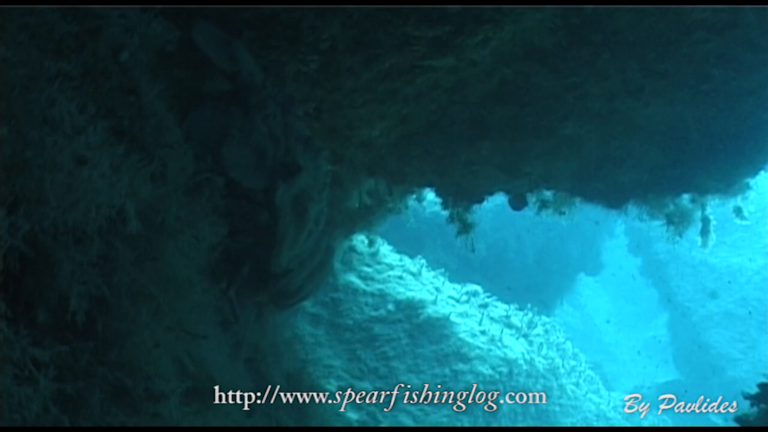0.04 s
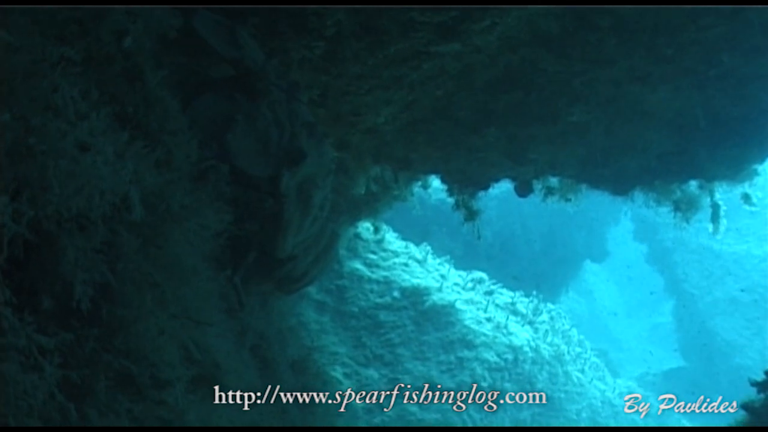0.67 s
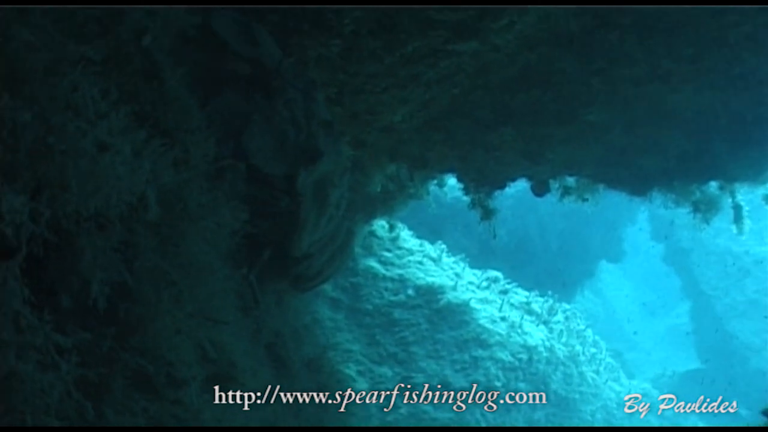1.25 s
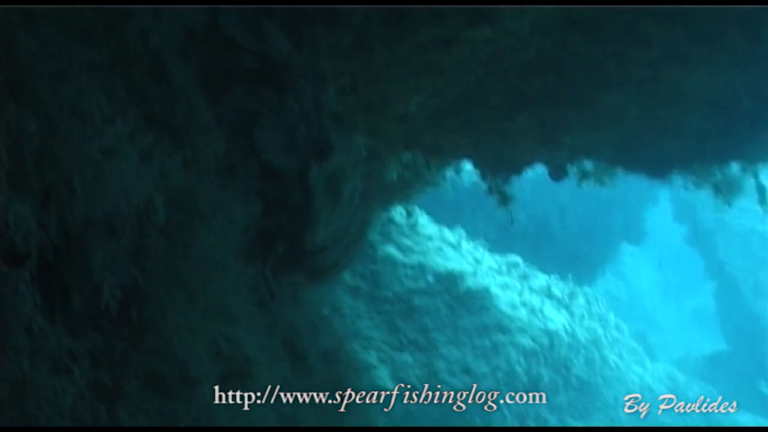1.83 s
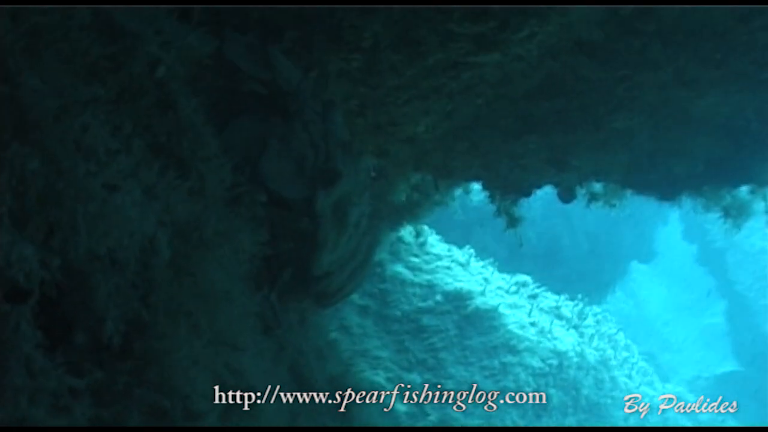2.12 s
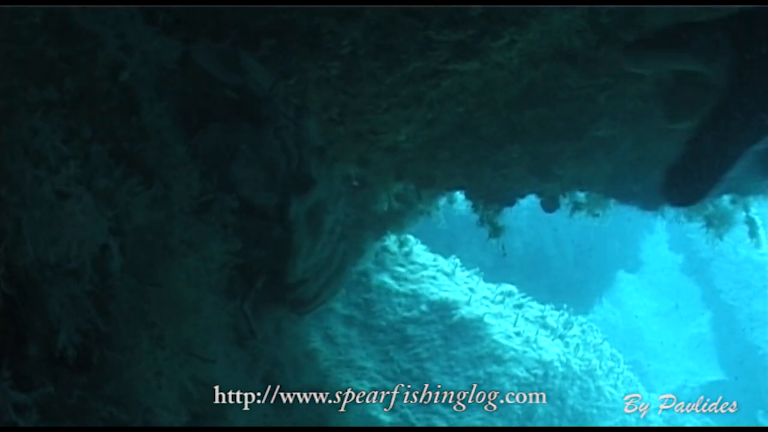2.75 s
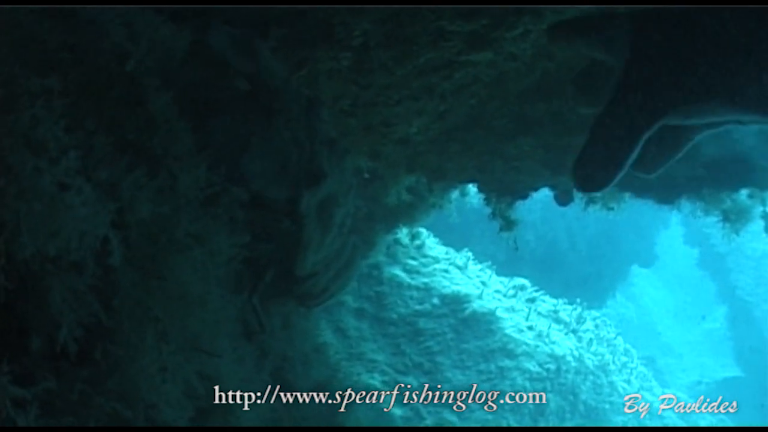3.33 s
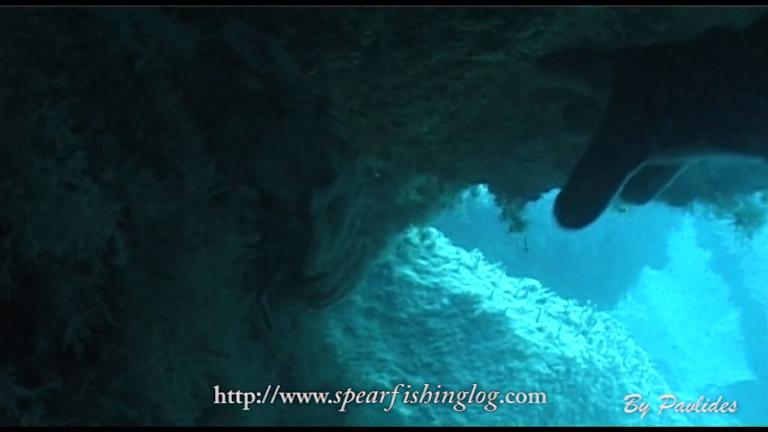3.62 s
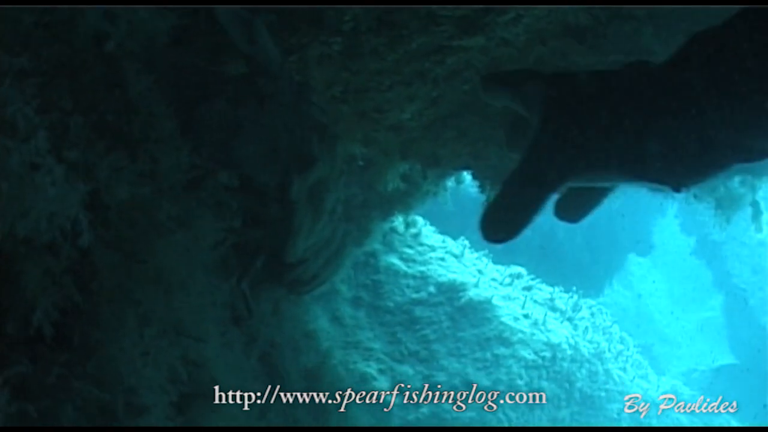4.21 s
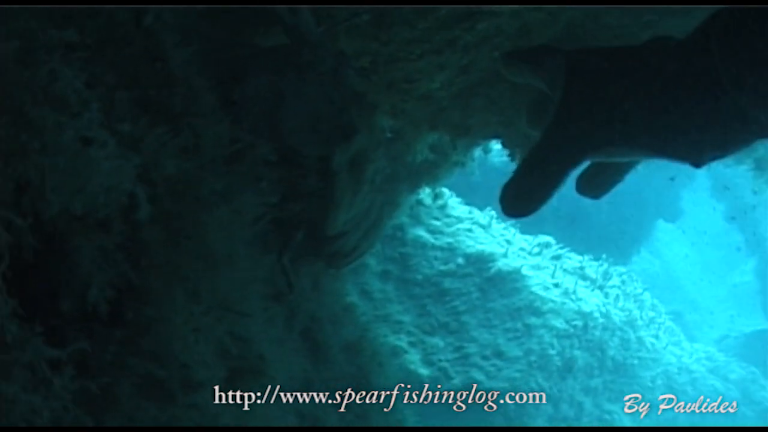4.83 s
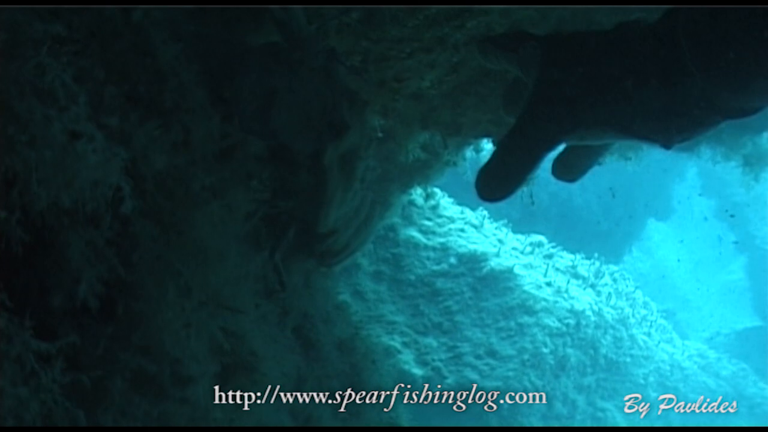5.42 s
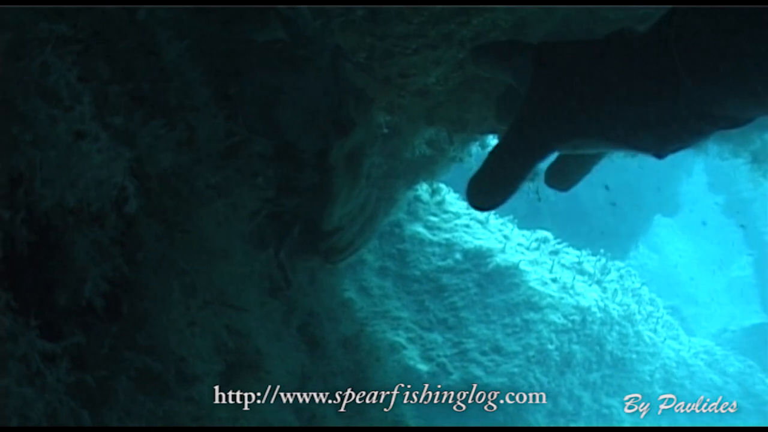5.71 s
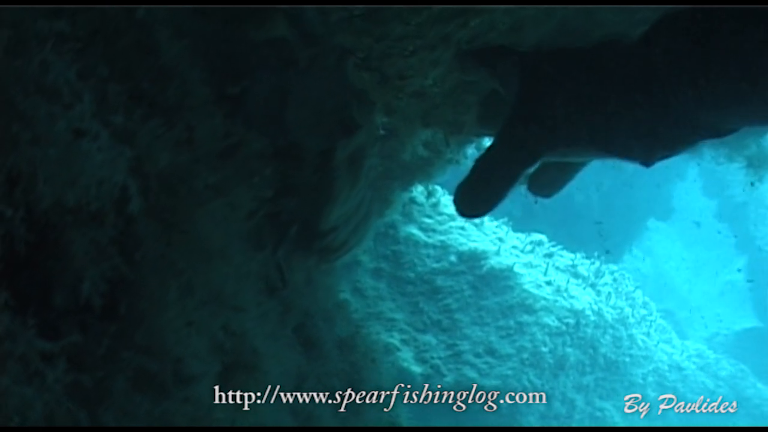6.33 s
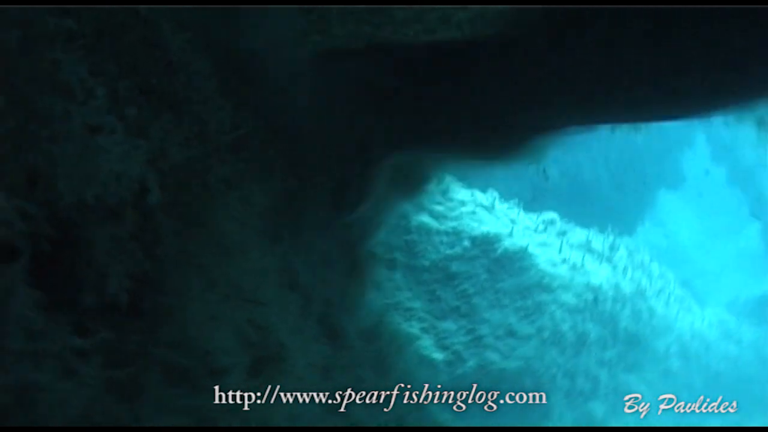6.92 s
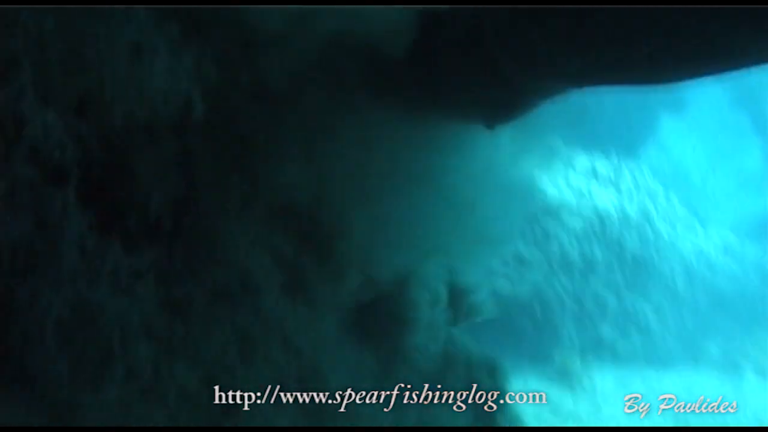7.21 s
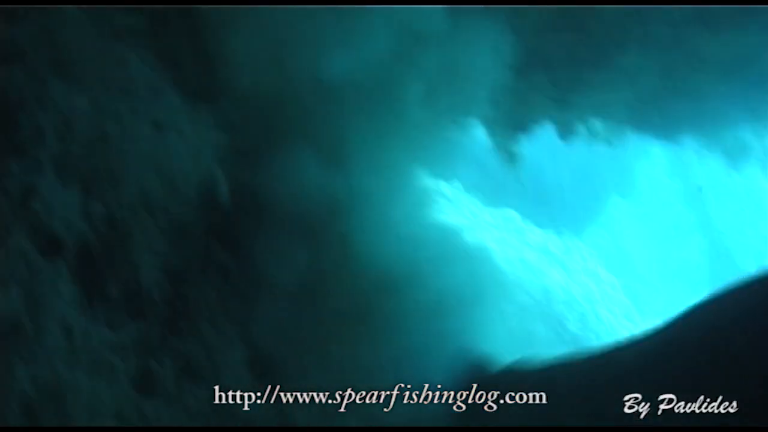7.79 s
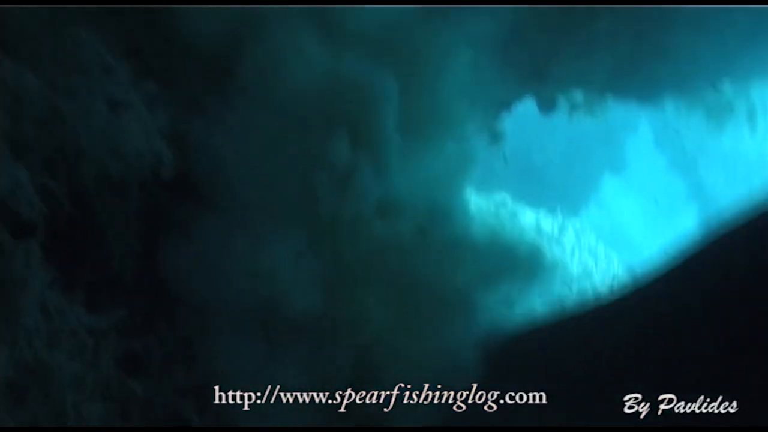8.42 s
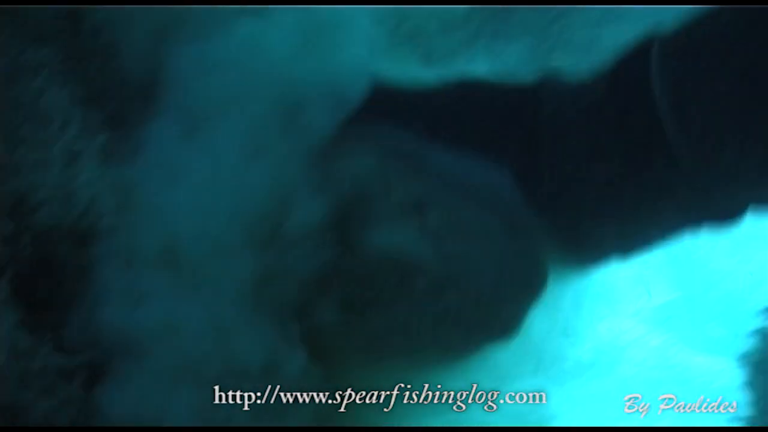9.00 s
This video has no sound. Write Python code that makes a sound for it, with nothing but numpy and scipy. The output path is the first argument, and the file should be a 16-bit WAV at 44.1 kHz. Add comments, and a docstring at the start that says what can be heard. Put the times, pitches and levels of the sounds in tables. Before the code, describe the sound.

The sound is underwater, close to rock, heard through a microphone inside a camera housing. From the start, the motor gives a steady low hum with a whir and faint high whine. Snapping shrimp crackle all around, and sharper, irregular snaps stand out nearby, mostly during the first six seconds, over a soft wash of water. At about 3.9 seconds a sharp knock hits the case with a small push of water. From about 7 seconds a diver grabs into a crevice: water surges past in low rumbles, the case rubs on rock in short strokes, and grit crunches. Hard, hollow knocks land around 7.5 and 7.7 seconds, followed by sharp sand cracks near 7.8. Another surge and cluster of knocks comes at 8.5 seconds, then lighter bumps and rubbing. A very brief, thin, high squeak sounds at about 9.1 seconds.

```python
"""Diver at a rock crevice

Underwater, close to the rock, with one microphone inside a camera housing. The motor hums and whirs
right beside it, and the claws of snapping shrimp crackle all around. A gloved diver reaches into a
crevice and grabs an animal: water surges past, the case takes a few knocks and rubs along the rock,
grit scrapes on it, and a short squeak follows."""
import sys
import numpy as np
from scipy import signal
from scipy.fft import rfft, irfft
from scipy.io import wavfile
from scipy.ndimage import map_coordinates

SR = 44100
rng = np.random.default_rng(int(sys.argv[2]) if len(sys.argv) > 2 else 0)


def generate_wav(sig):
    """Save sig (samples, or channels by samples) to the path in sys.argv[1] as 16-bit PCM at SR."""
    pcm = np.round(np.clip(np.atleast_2d(sig).T, -1, 1) * 32767).astype(np.int16)
    wavfile.write(sys.argv[1], SR, pcm)


N = 403515
TIME = np.arange(N) / SR


def amp(db):
    """Decibels to gain."""
    return 10 ** (np.asarray(db) / 20)


def unit(x):
    """Scale to rms 1."""
    return x / np.sqrt(np.mean(x ** 2) + 1e-20)


def along(points, hz):
    """Interpolate (Hz, value) points on a log frequency axis."""
    f, values = np.transpose(points)
    return np.interp(np.log(hz + 1), np.log(f + 1), values)


def curves(rows):
    """One value per sample for each column after the time."""
    times, *columns = np.transpose(rows)
    return [np.interp(TIME, times, column) for column in columns]


def wobble(rate):
    """A smooth random curve, rate knots a second."""
    return map_coordinates(rng.standard_normal(int(N * rate / SR) + 4), [TIME * rate])


def add(track, start, sound):
    """Mix a sound in at start seconds."""
    part = track[round(start * SR):][:len(sound)]
    part += sound[:len(part)]


def through(x, response):
    """Play x through an impulse response."""
    return signal.fftconvolve(x, response)[:len(x)]


def grains(n, rate, spread_db):
    """Random impulses, rate a second, of log-normal size."""
    chance, size, sign = rng.random(n), rng.standard_normal(n), rng.choice([-1, 1], n)
    return (chance < rate / SR) * amp(spread_db * np.clip(size, -2, 2)) * sign


def burst(response, t60, size=4096):
    """A short flurry of pressure through a response, peak 1."""
    hit = through(rng.standard_normal(size) * amp(-60 * TIME[:size] / t60), response)
    return hit / np.abs(hit).max()


# Antiresonances of the case, and one slight lift. Each row: centre in Hz, width in Hz, gain in dB.
CASE_DIPS = [(325, 24, -1.5), (528, 63, -3.5), (1442, 38, -12.5), (2130, 34, -8.5), (2974, 53, -36.5),
             (4870, 180, 2.5)]
def ringing(modes, base=((30, -60), (12000, -60)), tilt=((30, 0), (12000, 0)), size=4096):
    """Impulse response of resonances, with the case's dips; base and tilt are (Hz, dB) points."""
    hz = np.fft.rfftfreq(size, 1 / SR)
    peaks = sum(amp(db) / (1 + 2 * ((hz - f) / width) ** 2) for f, width, db in modes)
    dips_db = sum(db * np.exp(-((hz - f) / width) ** 2) for f, width, db in CASE_DIPS)
    gain = (amp(along(base, hz)) + peaks) * amp(along(tilt, hz) + dips_db)
    cepstrum = irfft(np.log(gain + 1e-6))
    causal_fold = np.r_[1, np.full(size // 2 - 1, 2), 1, np.zeros(size // 2 - 1)]
    return irfft(np.exp(rfft(cepstrum * causal_fold)))[:size // 2]


# Resonances of the case around the microphone. Each row: centre in Hz, width in Hz, gain in dB.
CASE_MODES = [(721.4, 28, -5), (800, 24.7, -3.5), (963.3, 93.4, 3), (1380, 224, -20.5), (1557, 137, -12),
              (1792, 124, -11.5), (2450, 355, -13), (2836, 520, -21.5), (2990, 96, -4.5), (3541, 289, -3),
              (4054, 290, -22.5), (4698, 283, -21.5), (5570, 81, -29), (6300, 100, -34.5),
              (7130, 550, -34.5)]
# What its wall passes between them. Each row: frequency in Hz, gain in dB.
CASE_WALL = [(30, -21), (90, -23.5), (200, -22.5), (380, -62), (600, -34), (1450, -32.5), (2100, -46),
             (5200, -39), (6000, -34), (9000, -43.5), (12000, -40.5)]
def housing(tilt):
    """The path through the case to the microphone, tilted to one source's colour."""
    return ringing(CASE_MODES, CASE_WALL, tilt)


# The motor's whir, right beside the microphone. Each row: time in seconds, relative level in dB.
MOTOR_WHIR = [(0.0, -42), (2.47, -40.5), (2.62, -42), (7.36, -40.5), (8.21, -45), (9.15, -42)]
# Its thin high tones. Each row: frequency in Hz, relative level in dB.
MOTOR_WHINE = [(5399, -81), (5599, -71), (5652, -67), (6401, -71), (6449, -80), (7251, -90), (8048, -75),
               (8102, -83), (8699, -87), (8850, -90), (10449, -89), (10799, -80)]
def motor(hum_hz=150.1, hum_db=-51.0, whir_db=3.0, flutter_db=0.58, whine_db=-3):
    """A steady hum, a thin whine, and bearing chatter that rings the low modes of the case."""
    level_db, = curves(MOTOR_WHIR)
    turning = TIME + np.cumsum(0.00037 * wobble(5)) / SR  # the speed wanders slightly
    hum = np.sin(2 * np.pi * hum_hz * turning) * amp(hum_db + 0.41 * wobble(6.8))
    whine = np.sqrt(2) * sum(amp(db + whine_db + 1.5 * wobble(4)) * np.sin(2 * np.pi * hz * turning)
                             for hz, db in MOTOR_WHINE)
    case = housing([(30, -1), (1100, 0), (1700, -2), (3000, -4.5), (5000, -6), (11000, -3)])
    chatter = unit(through(grains(N, rate=5000, spread_db=3), case))
    return hum + whine + chatter * amp(level_db + whir_db + flutter_db * wobble(25))


def far_shrimp(crackle_db=-45.5, ticks_db=-47.5, drift_db=-0.95, fade_db_per_s=0.05):
    """Countless far snaps merge into a crackle that slowly waxes and wanes; closer ones tick."""
    far_path = housing([(100, -15), (900, -11.5), (1700, -0.5), (3500, 0), (7000, 4.5), (11000, 3)])
    far_snaps = grains(N, rate=700, spread_db=4) * amp(3.7 * wobble(70))
    crackle = unit(through(far_snaps, far_path))
    flurries = through(np.abs(grains(N, rate=36, spread_db=2.2)), np.exp(-TIME[:2048] / 0.006))
    tick_path = housing([(100, -5), (900, -12.5), (1700, -4), (2800, 2), (3600, 4.5), (4700, 2),
                         (7000, 5), (11000, -10)])
    ticks = unit(through(flurries * rng.standard_normal(N), tick_path))
    swell = amp(drift_db * wobble(2.65) - fade_db_per_s * TIME)
    return swell * (crackle * amp(crackle_db) + ticks * amp(ticks_db))


# The diver's arm pushes water past the case. Each row: peak time in seconds, strength in dB.
ARM_SURGES = [(3.96, -47), (7.02, -46), (7.19, -34.5), (7.36, -53), (7.53, -37), (7.68, -45), (7.81, -47),
              (8.505, -33), (9.04, -45)]
def flow(rise_s=0.027, fall_s=0.029, wake_db=-63.5, wake_s=0.41):
    """Strength of the current at the case: each surge swells, falls and leaves a weak wake."""
    total = np.zeros(N)
    for peak, db in ARM_SURGES:
        before, after = np.maximum(peak - TIME, 0), np.maximum(TIME - peak, 0)
        surge = amp(db) * np.exp(-after / fall_s)
        wake = amp(wake_db) * np.exp(-after / wake_s)
        total += np.exp(-before / rise_s) * (surge + wake)
    return total


# Water moving around the nearby rock. Each row: time in seconds, relative level in dB.
ROCK_WASH = [(0.0, -59), (4.51, -69), (6.65, -68.5), (7.74, -63.5), (8.15, -63.5), (8.97, -58.5),
             (9.15, -51.5)]
def water(still_db=-78.0, wash_db=2.5, stirred_db=-15):
    """Eddies rumble on the case as the diver moves, over a soft wash that swells with them."""
    calm_db, = curves(ROCK_WASH)
    rumble = ringing([(57.4, 30, -0.81), (120, 70, -1.1)], base=[(20, -46), (400, -30), (2000, -85)],
                     tilt=[(15, 5), (40, -8)])
    eddies = unit(through(rng.standard_normal(N), rumble)) * amp(3 * wobble(30))
    murmur = ringing([(252, 87, -0.5), (407, 62, -8), (574, 99, 5.5)], tilt=[(600, 2.5), (1500, -21)])
    wash = unit(through(rng.standard_normal(N), murmur))
    current = flow()
    wash_gain = amp(calm_db + wash_db + wobble(10)) + amp(stirred_db) * current
    return eddies * (amp(still_db) + current) + wash * wash_gain


def snap(treble_db, echo_db=-9):
    """One claw snap rings the case, and an echo from the crevice walls follows."""
    case = housing([(100, -36), (900, -6), (1700, -3.5), (2800, 4.5), (3500, 5.5),
                    (4700, 2 + treble_db / 2), (7000, treble_db), (11000, -6.5 + treble_db)])
    sound = burst(case, t60=0.028)
    echo_s = rng.uniform(0.002034, 0.006)
    add(sound, echo_s, amp(echo_db) * burst(case, t60=0.03))
    return sound


# Shrimp in the rock nearest the microphone.
# Each row: start in seconds, relative peak in dB, relative treble in dB.
CLAW_SNAPS = [(0.2309, -16, -32), (0.3097, -18.5, -25), (0.5231, -16.5, -28), (1.0072, -17.5, -16.5),
              (1.2523, -20, -37), (1.3767, -24.5, -16), (1.492, -21.5, -34), (1.6866, -20, -26),
              (2.3073, -19, -27), (2.5536, -25, -20), (2.7101, -20, -23), (2.8, -19, -27),
              (2.824, -20.5, -24), (2.8863, -17.5, -29), (3.0366, -17, -28), (3.0514, -20.5, -26),
              (3.2284, -19.5, -27), (3.5154, -21, -30), (3.5827, -19.5, -24), (4.2393, -23.5, -27),
              (4.436, -22.5, -32), (4.4847, -14.5, -35), (5.1204, -24.5, -35), (5.7339, -17, -15),
              (6.0871, -22, -28), (6.2292, -24, -30), (6.2803, -20.5, -40)]
def near_shrimp(near_db=-1.0, treble_lift_db=30.5, colony_db=-26, scatter_db=1, colour_db=4, count=24):
    """The nearest shrimp snap loudly; others join in at random, each with its own brightness."""
    out = np.zeros(N)
    for start, db, treble_db in CLAW_SNAPS:
        add(out, start, amp(db + near_db) * snap(treble_db + treble_lift_db))
    for start, (size, colour) in zip(rng.uniform(0, N / SR, count), rng.standard_normal((count, 2))):
        add(out, start, amp(colony_db + scatter_db * size) * snap(colour_db * colour))
    return out


# The shell of the case when struck or rubbed. Each row: centre in Hz, width in Hz, gain in dB.
SHELL_MODES = [(90, 140, -26), (272, 300, -17), (413, 54, -12), (474, 64, 0.5), (706, 100, -0.5),
               (867, 78, 4.5), (1040, 47, -5.5), (1212, 170, -2), (1600, 92, -9), (1945, 84, -7.5),
               (2830, 100, -26), (3280, 133, -3.5)]
# Blows right on the case. Each row: start in seconds, knock peak in dB, hardness (crack over knock)
# in dB, shove over knock in dB.
BLOWS = [(3.914, -16, 4, -30), (3.935, -37.5, -12, 12), (7.516, -13.5, 7.5, 11), (7.5229, -13, -1, -12),
         (7.666, -18, -26, -22), (7.672, -11.5, -15.5, -18), (8.464, -18.5, -9, -7), (8.48, -21, -20, 1),
         (8.504, -11, -6, -13), (8.525, -37, -12, 13), (8.633, -24, -4.5, -4.5), (8.81, -36.5, -15, 7.5),
         (8.949, -29.5, -20, -3), (9.026, -28, -22, 7.5)]
def knocks(push_s=0.0019, ring_hz=490, ring_t60=0.11, ring_db=-9, tap_db=13, full_db=3, size=8192):
    """Each blow shoves the case and rattles its shell; hard, heavy ones leave a low mode ringing."""
    out, t = np.zeros(N), TIME[:size]
    case = housing([(100, -13), (400, 9), (600, 4), (750, -5), (950, -14), (1350, 11), (1700, 5.5),
                    (2100, 10), (2600, 0.5), (3300, 2.5), (4500, -6.5), (7000, 11.5), (11000, -7)])
    u = t / push_s
    push = 2 * (1 - u) * np.exp(-u) * (1 - np.exp(-10 * u))
    low_mode = np.sin(2 * np.pi * ring_hz * t) * amp(-60 * t / ring_t60)
    for start, db, hard_db, shove_db in BLOWS:
        bass_db = min(full_db, tap_db + shove_db - hard_db)  # a light, sharp tap stirs little bass
        tilt = [(200, 2.5 + bass_db), (350, 9 + bass_db), (500, -1.5), (1100, 3.5), (1600, -11),
                (4000, -9)]
        knock = burst(ringing(SHELL_MODES, tilt=tilt), t60=0.02)
        crack = amp(hard_db) * burst(case, t60=0.015)
        ring = amp(ring_db + hard_db + 0.1 * shove_db) * low_mode
        add(out, start, amp(db) * (knock + crack))
        add(out, start, amp(db) * (amp(shove_db) * push + ring))
    return out


def stroke(response, length, rate, spread_db, release_s=0.0082, jerk_db=2.5, jerk_hz=110, size=16384):
    """Stick-slip grains under a rounded, jerky swell with a soft release, rms 1 over its length."""
    t = TIME[:size]
    pressure = np.sqrt(np.abs(np.sin(np.pi * np.clip(t / length, 0, 1))))
    release = np.exp(-np.abs(t - length) / release_s) / 2 * (t > length / 2)
    jerks = amp(jerk_db * map_coordinates(rng.standard_normal(256), [t * jerk_hz]))
    sound = through(grains(size, rate, spread_db) * np.maximum(pressure, release) * jerks, response)
    return sound / np.sqrt(np.sum(sound ** 2) / (length * SR) + 1e-20)


# The case slides on rock, just its wall away from the microphone.
# Each row: start in seconds, length in seconds, rubbing level in dB, grit level in dB.
SLIDES = [(6.914, 0.044, -42, -44), (6.999, 0.26, -43.5, -41), (7.199, 0.023, -36, -37),
          (7.051, 0.021, -21.5, -31), (7.076, 0.024, -32, -30), (7.142, 0.026, -22.5, -31),
          (7.164, 0.031, -17.5, -27), (7.319, 0.029, -45, -26.5), (7.382, 0.12, -71, -34),
          (7.742, 0.035, -50.5, -31.5), (7.782, .022, -43, -29), (8.12, 0.14, -56, -42.5),
          (8.405, 0.019, -32, -48), (8.44, 0.019, -37, -49), (8.479, 0.019, -31.5, -45),
          (8.505, .014, -31, -48), (8.911, 0.029, -46, -39), (8.94, 0.2, -44, -53)]
# Sand grains crack under it. Each row: start in seconds, peak in dB, pitch in Hz, treble in dB.
SAND_CRACKS = [(7.0547, -15.5, 3560, -12), (7.0932, -14, 3280, -2), (7.3267, -23, 3450, 0),
               (7.3534, -19, 3440, -3), (7.677, -22, 3440, 8), (7.691, -22.5, 3690, 9),
               (7.7025, -25, 3530, 10), (7.7518, -14, 3540, 12), (7.776, -9.5, 2700, 1),
               (7.803, -9, 3700, -1), (8.0471, -21, 3740, 4), (8.6319, -16.5, 3440, -6.5)]
def scraping():
    """Rubbing on rock rings the shell low; sand crunches high, each big grain at its own pitch."""
    out, shell = np.zeros(N), ringing(SHELL_MODES)
    sand = housing([(100, -17), (800, -9.5), (1200, 10.5), (1500, -1.5), (2000, 9.5), (3500, 4),
                    (4500, 12.5), (6200, 13), (7050, 18.5), (8500, 14.5), (10200, 20), (11700, 15)])
    for start, length, rub_db, grit_db in SLIDES:
        add(out, start, amp(rub_db) * stroke(shell, length, rate=1600, spread_db=8.5))
        add(out, start, amp(grit_db) * stroke(sand, length, rate=1400, spread_db=6))
    for start, db, hz, treble_db in SAND_CRACKS:
        base = [(300, -2), (5000, -10 + treble_db / 2), (10000, -0.5 + treble_db)]
        grain = ringing([(hz, 1200, 0)], base)
        add(out, start, amp(db) * burst(through(grain, sand), t60=0.016))
    return out


# The squeak at the crevice. Each row: time in seconds, pitch in Hz, level in dB.
SQUEAK_GLIDE = [(9.078, 8950, -74), (9.083, 7900, -46.5), (9.087, 6830, -39), (9.097, 6940, -36),
                (9.104, 5730, -42.5), (9.109, 7860, -44), (9.114, 9100, -64)]
def squeak(roughness=0.029):
    """A thin, brief squeak of something wet slipping."""
    hz, db = curves(SQUEAK_GLIDE)
    sounding = (TIME > SQUEAK_GLIDE[0][0]) & (TIME < SQUEAK_GLIDE[-1][0])
    phase = 2 * np.pi * np.cumsum(hz * (1 + roughness * wobble(1500))) / SR
    return sounding * amp(db) * np.sqrt(2) * np.sin(phase)


def scene():
    """Everything reaches one microphone inside the case."""
    return (motor() + far_shrimp() + water() + near_shrimp() + knocks() + scraping() + squeak())[None]


def record(dry, low_hz=30, top_hz=12000, ceiling=0.6):
    """The camera loses the deepest bass, rounds off the hardest peaks and cuts the highest treble."""
    thinned = signal.sosfilt(signal.butter(2, low_hz, "high", fs=SR, output="sos"), dry)
    limited = thinned / (1 + np.abs(thinned / ceiling) ** 6) ** (1 / 6)
    return signal.sosfiltfilt(signal.butter(22, top_hz, fs=SR, output="sos"), limited)


dry = scene()
out = record(dry)
generate_wav(out)
```